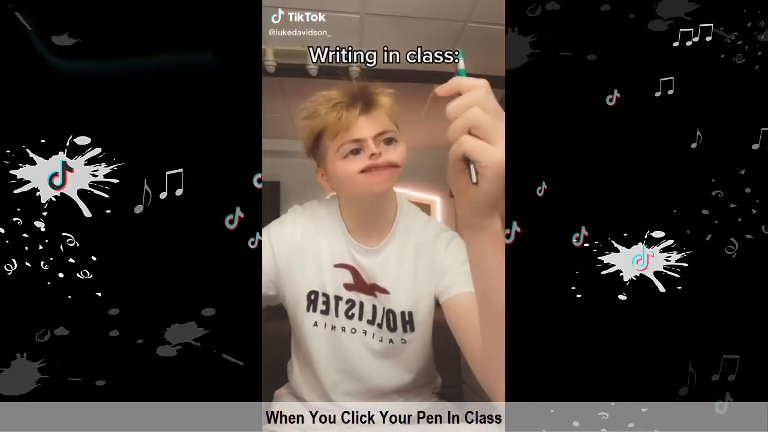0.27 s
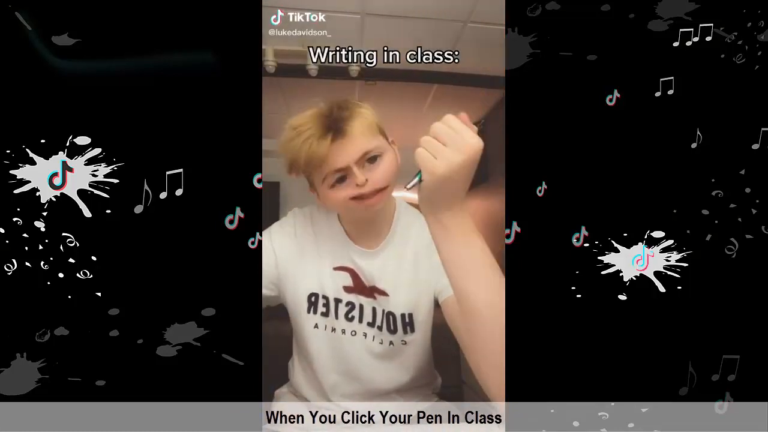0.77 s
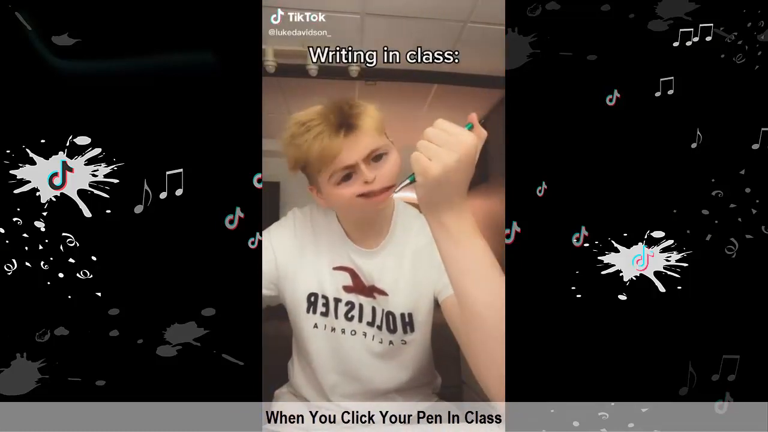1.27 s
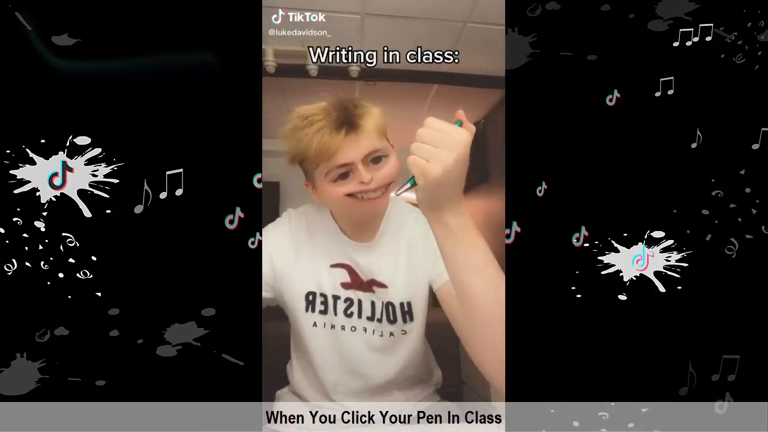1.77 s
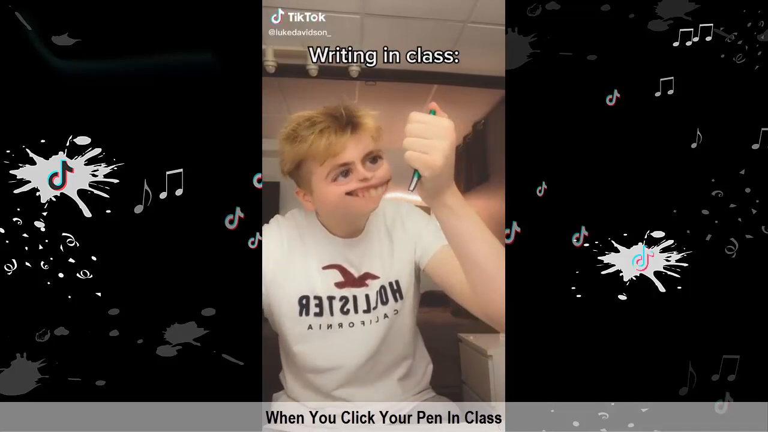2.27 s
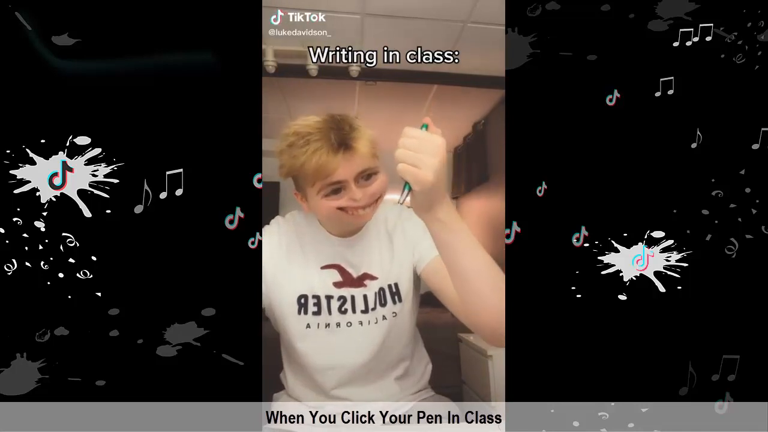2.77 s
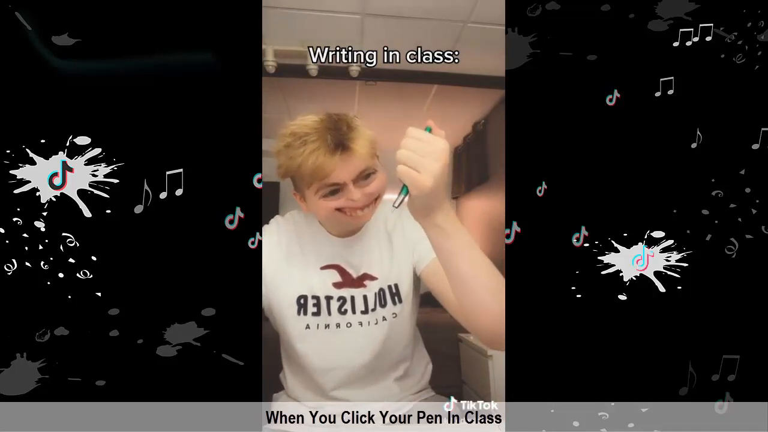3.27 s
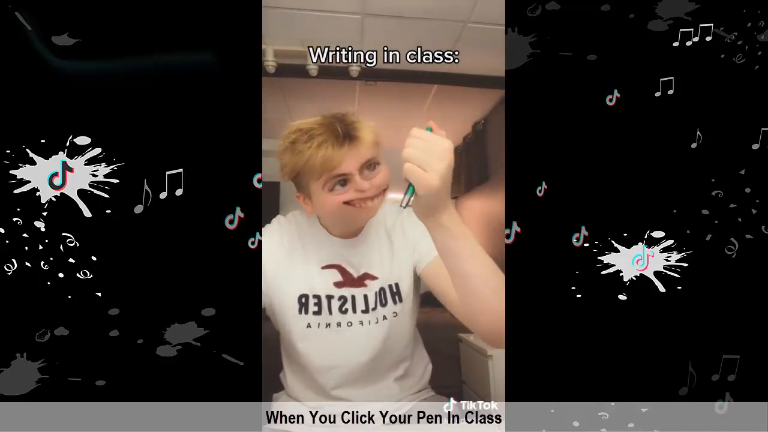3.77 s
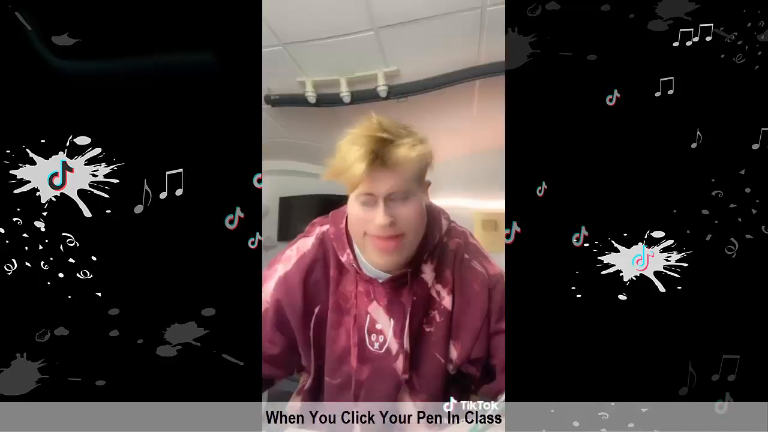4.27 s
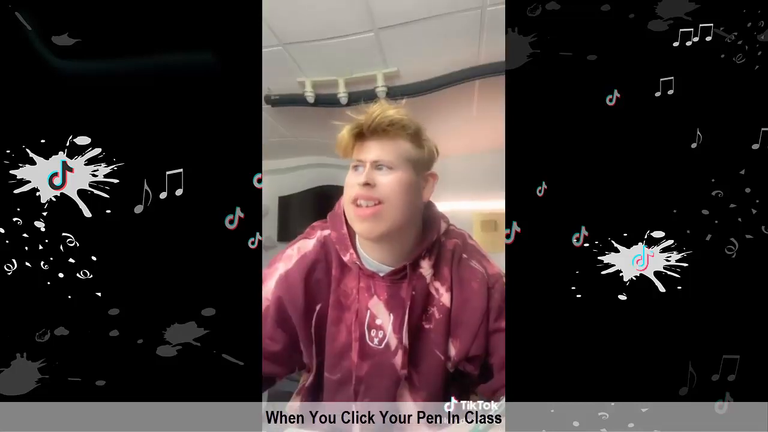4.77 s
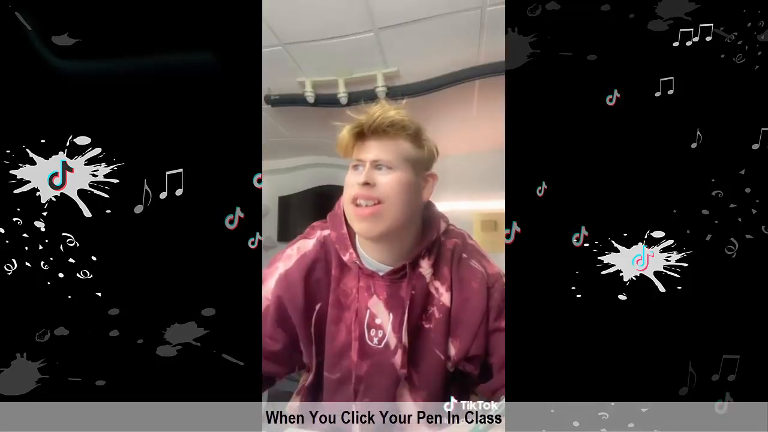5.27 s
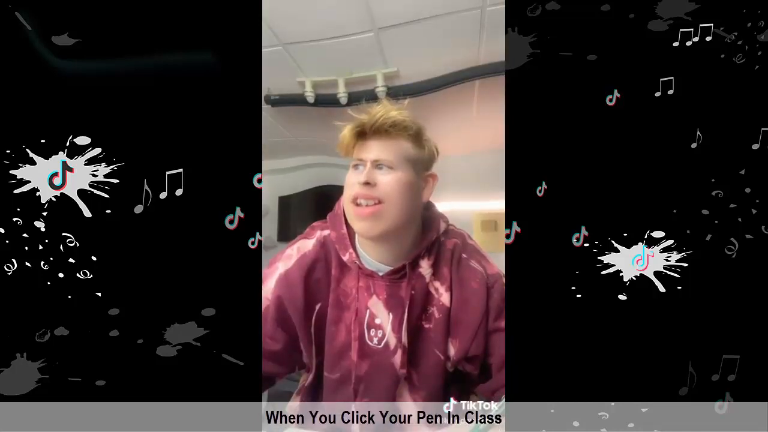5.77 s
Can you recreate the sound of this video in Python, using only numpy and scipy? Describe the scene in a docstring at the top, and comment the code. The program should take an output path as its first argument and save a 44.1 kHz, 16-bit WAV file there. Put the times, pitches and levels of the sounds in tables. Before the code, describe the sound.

A hand-held plastic pen clicks fast and irregularly, bright and slightly raspy, with a tiny spring ring and dry thumb friction around each click. It starts after nearly a second of quiet rumble. Early clicks are sparser and more reflective, later ones dense and close. A very faint blurred low tone creeps upward under quiet indoor air, and the clicking weakens near the end.

```python
"""Room air, handling rumble and a few faint contacts come first, with a low drone far below them.
From 0.8 s a plastic retractable pen is clicked in a fast, uneven run: bursts of noise ring barrel and spring.
Soft bumps fall in the first 1.7 s; thumb rub, noise swelling around each click, builds up until 1.75 s.
Reflections are strongest early. Towards the end the air grows and the drone, a blurred tone, rises in pitch."""
import sys
import numpy as np
from scipy import signal
from scipy.fft import rfft, irfft, next_fast_len
from scipy.io import wavfile
from scipy.ndimage import uniform_filter1d, map_coordinates

SR = 44100
rng = np.random.default_rng(int(sys.argv[2]) if len(sys.argv) > 2 else 0)


def master(y):
    """Save y as 16-bit WAV."""
    cut = np.clip(np.atleast_2d(y).T, -1, 1)
    pcm = np.round(cut * 32767)  # scale
    wavfile.write(sys.argv[1], SR, pcm.astype(np.int16))


N = 264600

# Room air and handling rumble spectra: (frequency [Hz], relative density [dB])
AIR_SPECTRUM = [(30, -24), (85, -23.5), (150, -7.5), (240, 2), (305, -5), (395, 0.5), (435, -7), (560, -6),
                (615, -13), (760, -12), (1100, -17.5), (2300, -21), (6000, -36.5), (15000, -50)]
HANDLING_SPECTRUM = [(15, -2), (35, 0), (90, -10), (170, -7), (400, -39)]
# Room air level: (time [s], level [dB])
AIR_LEVEL = [(0, -60), (3.3, -59.5), (4.6, -58.5), (5.3, -56.5), (6, -55.5)]
# Handling rumble level before its trim: (time [s], level [dB])
HANDLING_LEVEL = [(0, -71), (.4, -65), (.9, -71), (2, -84), (3.2, -99), (4.6, -90), (5.2, -75), (6, -87)]
# Drone glide: (time [s], nominal pitch [Hz], fundamental level [dB])
DRONE_GLIDE = [(0, 100, -82), (2.5, 118, -85.5), (4, 145, -72.5), (5.1, 168, -65.5), (5.6, 190, -70),
               (6, 215, -61.5)]
# Bumps: (time [s], level [dB])
BUMPS = [(0.846, -52), (1.277, -62.5), (1.62, -69)]
# Bump spectrum: (frequency [Hz], relative density [dB])
BUMP_SPECTRUM = [(20, -12), (60, 1), (150, -0.5), (260, -18), (700, -50)]
# Reverberation time of the room: (frequency [Hz], t60 [s])
ROOM_T60 = [(300, 0.67), (3000, 0.099), (8000, 0.23), (15000, 0.16)]
# Send into the room: (time [s], gain [dB])
ROOM_SEND = [(1.4, 5.5), (2.2, -0.5), (6, 0.5)]
# Treble gain around 8 kHz, then above 12 kHz: (time [s], gain [dB])
MID_TREBLE = [(.9, 1), (1.3, -1.5), (2.1, 0.5), (2.4, 5), (2.7, 2), (2.9, -1), (3.6, 2.5), (3.85, -5),
              (4.4, -6.5), (4.75, -1), (6, 1.5)]
TOP_TREBLE = [(.5, 7), (.85, -5), (1.3, 0), (1.9, 2), (2.2, -1.5), (2.55, 2.5), (2.7, -7), (2.9, 1),
              (3.5, 5), (4.7, -2), (5.65, 7.5)]
# Thumb rub spectrum: (frequency [Hz], relative density [dB])
RUB_SPECTRUM = [(1000, -2.5), (3500, 10), (6300, 7), (7800, 9), (10500, 9), (13500, 4.5), (15500, -1)]
# Presses and releases, before treble shading:
# (time [s], strength [dB], contact hardness [dB], barrel pitch [Hz], barrel ring level [dB])
CLICKS = [(0.098, -71.5, -2, 4300, -86), (0.159, -74.5, 4.5, 3580.0, -76), (0.399, -73.5, 5.5, 3580, -70.5),
          (0.558, -70.5, 6.5, 3510.0, -70.0), (0.793, -47, -1, 5730, -62), (0.836, -53.5, -8, 5300, -54),
          (0.894, -47.5, -0.5, 5500, -52), (1.274, -47.5, -0.5, 5200, -59), (1.372, -47.5, 2.5, 5140, -62),
          (1.626, -46, -0.5, 5830.0, -61), (1.725, -47, 0, 5850, -46), (1.775, -50.5, -6.5, 4650, -65),
          (1.87, -44.5, -2, 5230.0, -44), (1.912, -49, -4, 4330, -54), (2.116, -46.5, -0.5, 5160, -39),
          (2.21, -48, -4.0, 4350, -43.5), (2.279, -45, -3.5, 4550.0, -50.5),
          (2.335, -49, -5.0, 4100, -51.5), (2.416, -48.5, 3, 5500.0, -48.5), (2.49, -48.5, -3, 3570.0, -50),
          (2.55, -48, 1.0, 6240, -47.5), (2.619, -46.5, -2.0, 5000, -50), (2.689, -47, 8.5, 5660, -45.5),
          (2.744, -50, -5.5, 4270.0, -59.0), (2.829, -48, 0, 3070, -58), (2.9, -49, -1, 5080.0, -43),
          (3.248, -49, 1, 4500, -47.5), (3.311, -49, -1.5, 3580, -42), (3.414, -46.5, -3, 4830, -46),
          (3.454, -47, -3.0, 3900, -45), (3.556, -51, 5.5, 5540.0, -46), (3.613, -48.5, -5, 3850.0, -43),
          (3.702, -45.5, -0.5, 4800, -43), (3.741, -46.5, -0.0, 5410.0, -50), (3.827, -47, 2, 4960.0, -62),
          (3.895, -46.5, -2.5, 4480, -36.5), (3.972, -46.5, 2.5, 4700.0, -54),
          (4.115, -69, 11, 3470.0, -66), (4.183, -47.5, -2.5, 4980, -39.5), (4.279, -47.5, 6.5, 5360, -47),
          (4.388, -47.5, -0.5, 3860, -47), (4.45, -45, -1.0, 4830, -43.5), (4.693, -47, -3.5, 4880, -40.5),
          (4.788, -46.5, 5.5, 5040, -47.5), (4.867, -46.5, -6.5, 4060, -43),
          (4.976, -45.5, -2.0, 6000, -42), (5.056, -45.5, -4, 4360, -48), (5.149, -48.5, 3.5, 4900, -48.5),
          (5.212, -47.5, -5, 3940, -44.5), (5.323, -46.5, 0, 4460.0, -43.5),
          (5.478, -62, -8.5, 3510.0, -75), (5.559, -48.5, -4, 4920.0, -53), (5.646, -51, 5, 6000.0, -60),
          (5.719, -60, -2.5, 4470, -69.0), (5.819, -69.5, -1, 3700.0, -70), (5.931, -47, -5.5, 3820, -59)]
# Contact spectra, low to high: (frequency [Hz], relative density [dB])
KNOCK_SPECTRUM = [(100, -73), (300, -17), (700, -6), (1100, -8), (1700, -1), (2400, -3), (3300, -0.5),
                  (4500, -34), (6500, -31)]
SNAP_SPECTRUM = [(1500, -56), (4500, -13.5), (6200, -8), (7300, -1), (8700, -4), (9800, -8), (11500, -34)]
EDGE_SPECTRUM = [(3000, -78), (8000, -12.5), (9600, -8), (10200, -4), (11300, -4), (12000, -5),
                 (13500, -22)]
FIZZ_SPECTRUM = [(4000, -75), (10500, -2), (12200, -9), (12900, 2.5), (13600, -1.5), (14900, 2.5),
                 (15800, -21)]
# Fixed modes of the pen body: (centre [Hz], width [Hz], gain above the rest [dB])
BODY_MODES = [(3550, 450, 3), (4580, 380, 2), (5400, 400, 3.5), (8300, 400, 1.5), (10990, 400, 2)]

SPRING_HZ, BAND_LIMIT_HZ = 15332, 15830
KNOCK_DB, EDGE_DB, FIZZ_DB = -7, -0.5, -4.5  # against the snap, at 0 dB hardness
KNOCK_DB_PER_HARD_DB, EDGE_DB_PER_HARD_DB, FIZZ_DB_PER_HARD_DB = -0.75, 1, 0.8
RUB_DB, RUB_LEAD_S, RUB_TRAIL_S = -12.5, 0.043, 0.078  # against click strength; reach before and after
RESTING_RUB_DB = -79
RUB_START_DB, RUB_FULL_S = -15, 1.75  # extra gain at 0 s, gone by RUB_FULL_S


def amp(db):
    """Decibels to gain."""
    return 10 ** (np.asarray(db) / 20)


def unit(x):
    """Scaled to rms 1."""
    return x / np.sqrt(np.mean(x ** 2) + 1e-20)


def along(points, hz):
    """(Hz, value) points read on a log frequency axis."""
    f, v = np.transpose(points)
    return np.interp(np.log(hz + 1), np.log(f + 1), v)


def curves(rows):
    """One value per sample for each column after the time."""
    s, *cols = np.transpose(rows)
    return [np.interp(np.arange(N) / SR, s, c) for c in cols]


def filtered(x, response):
    """x times a response of frequency, zero-padded."""
    m = next_fast_len(len(x) + 2048)
    hz = np.fft.rfftfreq(m, 1 / SR)
    return irfft(rfft(x, m) * response(hz), m)[:len(x)]


def noise(spectrum):
    """Coloured noise of rms 1."""
    return unit(filtered(rng.standard_normal(N), lambda hz: amp(along(spectrum, hz))))


def resonance(f, centre, width):
    """Response of one damped mode, 1 at its centre."""
    return 1j * f * width / (centre ** 2 - f ** 2 + 1j * f * width)


def wobble(knots_per_s):
    """A smooth random curve through evenly spaced knots."""
    knots = rng.standard_normal(int(N * knots_per_s / SR) + 4)
    return map_coordinates(knots, [np.arange(N) * knots_per_s / SR])


def add(track, s, sound):
    """Mix a sound into the track from time s."""
    start = max(round(s * SR), 0)
    part = track[start:start + len(sound)]
    part += sound[:len(part)]


def patchy(x, depth_db):
    """Slow random swells, each in its own narrow band."""
    z = signal.stft(x, nperseg=2048)[2]
    field = uniform_filter1d(rng.standard_normal(z.shape), size=3, axis=0)  # over frequency
    field = uniform_filter1d(field, size=5, axis=1)  # over time
    swollen = signal.istft(z * amp(depth_db * unit(field)), nperseg=2048)[1]
    return unit(swollen[:N])


def room_air():
    """Broadband air noise, patchy in time and frequency, grows slowly."""
    level_db, = curves(AIR_LEVEL)
    return amp(level_db) * patchy(noise(AIR_SPECTRUM), depth_db=3.5)


def handling_rumble(trim_db=-2):
    """The hand-held phone rumbles at low frequency while the pen is raised and again near the end."""
    level_db, = curves(HANDLING_LEVEL)
    return amp(level_db + trim_db) * noise(HANDLING_SPECTRUM)


def blurred_line(phase, multiple, knots_per_s):
    """A tone broadened by random modulation of its sine and cosine parts."""
    sine = wobble(knots_per_s) * np.sin(multiple * phase)
    cosine = wobble(knots_per_s) * np.cos(multiple * phase)
    return unit(sine + cosine)


def drone(blur_knots_per_s=24, overtone_db=-5):
    """A faint, blurred low tone with one overtone slowly rises."""
    hz, level_db = curves(DRONE_GLIDE)
    phase = 2 * np.pi * np.cumsum(hz) / SR
    fundamental = blurred_line(phase, 0.99, blur_knots_per_s * 0.99)
    overtone = blurred_line(phase, 2, blur_knots_per_s * 2)
    return amp(level_db) * (fundamental + amp(overtone_db) * overtone)


def bumps(swell_s=0.0153):
    """Soft, dull thuds as the hand shifts: low noise that swells, then decays."""
    t = np.arange(SR // 3) / SR
    out = np.zeros(N)
    for s, level_db in BUMPS:
        thud = noise(BUMP_SPECTRUM)[:len(t)] * t * np.exp(-t / swell_s)
        thud *= np.sqrt(2 * swell_s * SR) / np.linalg.norm(thud)  # rms 1 over two swell times
        add(out, s - swell_s, amp(level_db) * thud)
    return out


def room_response(wall_delay_s=0.024, wall_spread_s=0.0041, wall_db=-17, tail_db=-9.5):
    """The near walls answer in one cluster; a short tail decays at its own rate in each band."""
    hz, t, z = signal.stft(rng.standard_normal(SR // 2), SR, nperseg=256)
    decay_db = -60 * t / along(ROOM_T60, hz)[:, None]
    tail = signal.istft(z * amp(decay_db), SR, nperseg=256)[1]
    age_s = np.arange(len(tail)) / SR
    cluster = np.exp(-.5 * ((age_s - wall_delay_s) / wall_spread_s) ** 2)
    walls = rng.standard_normal(len(age_s)) * cluster
    return amp(tail_db) * tail / np.linalg.norm(tail) + amp(wall_db) * walls / np.linalg.norm(walls)


def room(x, count=20):
    """Reflections change as the hand moves; they are strongest while the pen is still being raised."""
    send_db, = curves(ROOM_SEND)
    out = np.zeros(N)
    for k, piece in enumerate(np.split(x * amp(send_db), count)):
        add(out, k * len(piece) / SR, signal.fftconvolve(piece, room_response()))
    return out


def shaded(x, centre_hz=8000, width_hz=1500, top_hz=12100, skirt_hz=350):
    """The colour of the treble drifts in two bands as the pen shifts in the fist."""
    middle = filtered(x, lambda hz: np.exp(-((hz - centre_hz) / width_hz) ** 4))
    top = filtered(x, lambda hz: .5 + .5 * np.tanh((hz - top_hz) / skirt_hz))
    middle_db, = curves(MID_TREBLE)
    top_db, = curves(TOP_TREBLE)
    return x + (amp(middle_db) - 1) * middle + (amp(top_db) - 1) * top


def thumb(grain_db=3, stroke_db=3.0, tick_db=2):
    """Skin and plunger rub in uneven slips, swelling to each click and fading after, by its strength."""
    t = np.arange(0, N, 64) / SR
    power = amp(RESTING_RUB_DB) ** 2
    for s, strength_db, *_ in CLICKS:
        reach_s = np.where(t < s, RUB_LEAD_S, RUB_TRAIL_S)
        level_db = strength_db + RUB_DB + RUB_START_DB * max(1 - s / RUB_FULL_S, 0)
        power = power + amp(level_db) ** 2 * np.exp(-((t - s) / reach_s) ** 2)
    travel, = curves(np.column_stack([t, np.sqrt(power)]))
    pressure_db = grain_db * wobble(90) + stroke_db * wobble(22.04) + tick_db * wobble(700)
    return travel * unit(noise(RUB_SPECTRUM) * amp(pressure_db))


def burst(t, rise_s, fall_s, scrape_db, grain_db):
    """The cam scrapes up its ramp, slips over in a rush of tiny contacts at t = 0 and rattles out."""
    slip = np.exp(-np.abs(t / np.where(t < 0, rise_s, fall_s)) ** 2.02)
    scrape = amp(scrape_db) * np.sin(np.pi * np.clip(t / t[0], 0, 1))
    contact_db = grain_db * np.minimum(rng.standard_normal(len(t)), 2)
    contacts = rng.standard_normal(len(t)) * amp(contact_db)
    return (slip + scrape) * contacts


def pen(barrel_width_hz=1100, scatter_db=2.5, spring_db=-8, spring_t60_s=0.067, scrape_db=-24, ragged_db=1.0):
    """Clicks ring barrel, body and spring; a harder contact trades knock for edge and fizz."""
    lead_s, core_s = .045, .018
    t = np.arange(-lead_s, .08, 1 / SR)
    hz = np.fft.rfftfreq(len(t), 1 / SR)
    body = 1 + sum((amp(db) - 1) * resonance(hz, centre, width) for centre, width, db in BODY_MODES)
    spectra = (KNOCK_SPECTRUM, SNAP_SPECTRUM, EDGE_SPECTRUM, FIZZ_SPECTRUM)
    knock, snap, edge, fizz = (amp(along(spectrum, hz)) for spectrum in spectra)
    spring = resonance(hz, SPRING_HZ, np.log(1000) / np.pi / spring_t60_s)
    out = np.zeros(N)
    for s, strength_db, hard_db, barrel_hz, barrel_db in CLICKS:
        teeth_db = map_coordinates(rng.standard_normal(80), [(t + lead_s) * 500], mode="nearest")
        slips = burst(t, rise_s=0.0077, fall_s=0.012, scrape_db=scrape_db, grain_db=3.0)
        contacts = rfft(amp(ragged_db * teeth_db) * slips)
        # the fingers damp the plastic a little differently each time
        grip_curve = map_coordinates(rng.standard_normal(64), [hz / 450], mode="nearest")
        grip = amp(scatter_db * grip_curve)
        barrel = resonance(hz, barrel_hz, barrel_width_hz) * resonance(hz, barrel_hz, 4600)
        knock_db = strength_db + KNOCK_DB + KNOCK_DB_PER_HARD_DB * hard_db
        edge_db = strength_db + EDGE_DB + EDGE_DB_PER_HARD_DB * hard_db
        fizz_db = strength_db + FIZZ_DB + FIZZ_DB_PER_HARD_DB * hard_db
        parts = [(knock, knock_db), (barrel, barrel_db), (snap, strength_db),
                 (edge, edge_db), (fizz, fizz_db), (spring, fizz_db + spring_db)]
        for part, level_db in parts:
            ring = irfft(contacts * body * grip * part, len(t))
            ring *= np.sqrt(core_s * SR) / np.linalg.norm(ring)  # all its energy counted over the core
            add(out, s - lead_s, amp(level_db) * ring)
    return out


def scene():
    """The pen in its room, over the background."""
    background = room_air() + handling_rumble() + drone() + bumps()
    clicks = pen()
    return (background + shaded(clicks + room(clicks) + thumb()))[None]


def record(dry):
    """The phone keeps nothing above its band limit."""
    return np.array([filtered(channel, lambda hz: hz < BAND_LIMIT_HZ) for channel in dry])


dry = scene()
out = record(dry)
master(out)
```